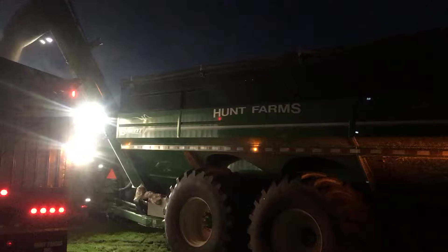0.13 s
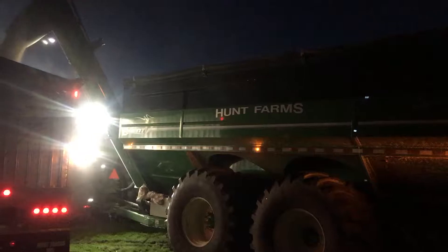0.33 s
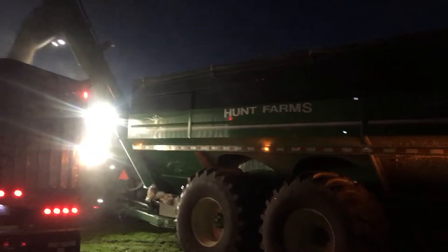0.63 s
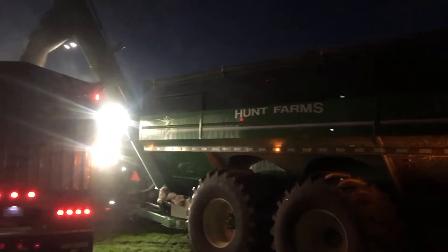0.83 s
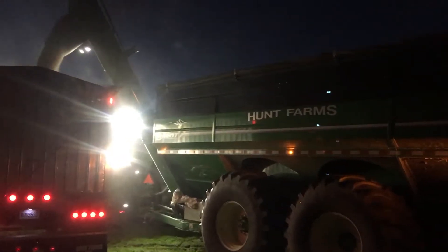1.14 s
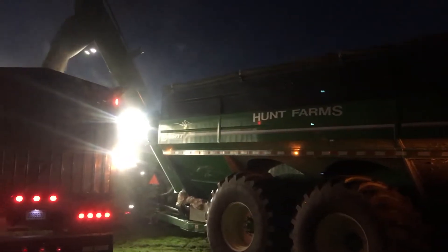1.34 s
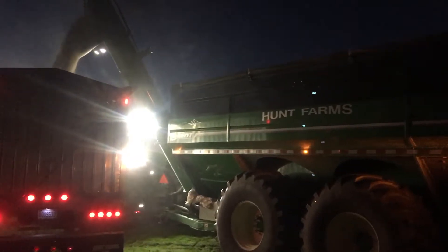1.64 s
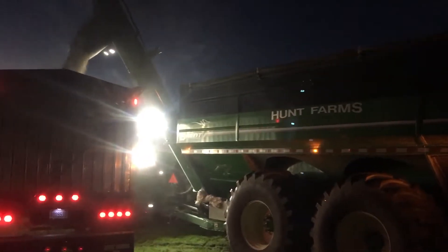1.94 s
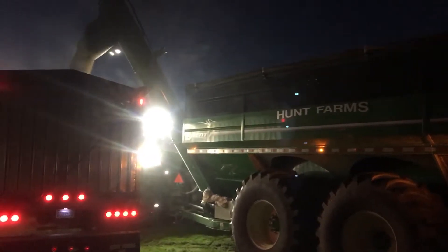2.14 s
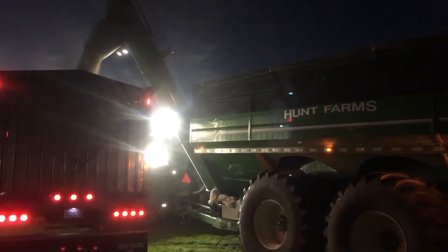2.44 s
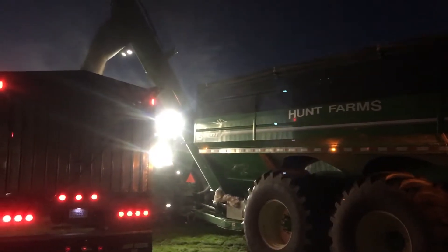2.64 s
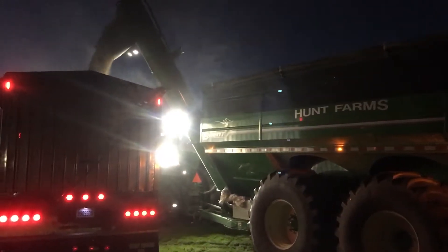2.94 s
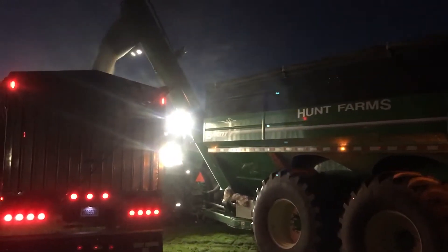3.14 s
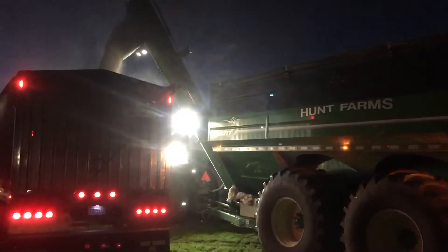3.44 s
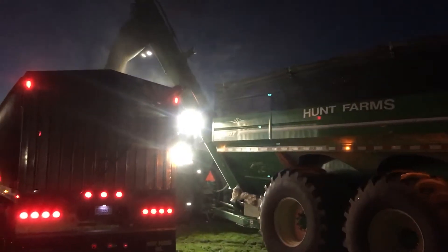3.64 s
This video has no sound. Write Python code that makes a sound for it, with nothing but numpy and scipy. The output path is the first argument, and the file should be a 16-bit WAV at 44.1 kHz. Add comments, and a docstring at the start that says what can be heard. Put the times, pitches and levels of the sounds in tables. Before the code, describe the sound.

Steady harsh roar of grain streaming through a metal auger tube, with tractor drone and low wind

```python
"""Grain is carried up a steel tube by an auger and poured into a trailer, at night on a farm.
Filtered streams of random hits make the tube scrape, the falling grain and the fine rustle;
scrape and fall surge once per auger turn. Wavering sines make the hums of the auger's drive.
A tractor at steady revs drones behind: sines at multiples of its crank speed over filtered noise.
Low noise of uneven level is the breeze on the one microphone. All cuts in after a moment of silence."""
import sys
import numpy as np
from scipy import signal
from scipy.fft import rfft, irfft, next_fast_len
from scipy.io import wavfile
from scipy.ndimage import uniform_filter1d, map_coordinates

SR = 44100
rng = np.random.default_rng(int(sys.argv[2]) if len(sys.argv) > 2 else 0)


def linear_from_db(decibels):
    """Turn decibels (scalar or array-like) into linear amplitude factors; 0 gives 1."""
    return 10 ** (np.asarray(decibels, float) / 20)


def put_to_file(sound):
    """Save the sound as 16-bit audio at rate SR, in the file named by the first command-line argument."""
    columns = np.atleast_2d(sound).T  # one column per channel
    safe = np.clip(columns, -1, 1)
    whole_steps = np.round(safe * 32767)
    wavfile.write(sys.argv[1], SR, whole_steps.astype(np.int16))


N = 166698  # length in samples

# uneven level of the low buffeting noise over time: (t/s, level/dB)
BUFFETING_LEVEL = [(0.13, -32), (0.22, -27), (0.27, -33), (0.35, -26.5), (0.4, -39), (0.48, -22),
                   (0.51, -37), (0.61, -31), (0.64, -29), (0.85, -36.5), (1.03, -31.5), (1.16, -35),
                   (1.25, -23), (1.28, -35), (1.38, -27.5), (1.56, -41), (1.67, -28), (1.7, -36),
                   (2.33, -35), (2.36, -29), (2.4, -45), (3.03, -30.5), (3.76, -33), (3.78, -44)]
# tone colour of the low buffeting noise on the microphone: (f/Hz, relative level/dB)
BUFFETING_COLOUR = [(20, -38), (40, -6), (70, 4.5), (110, 3), (150, -22.5), (300, -58)]
# tones of the engine: (multiple of crank speed, rms level before flicker/dB)
ENGINE_ORDERS = [(2, -56), (3, -51.5), (4, -55), (5, -51.5), (8, -47.5), (9, -64), (10, -44)]
# tone colour of the exhaust and cooling fan roar: (f/Hz, relative level/dB)
ROAR_COLOUR = [(20, -33), (45, -10.5), (140, 0), (280, -1), (335, 1), (420, -5.5), (520, -7), (900, -32),
               (2000, -90)]
# hums of the auger drive: (f/Hz, size of pitch wander/Hz, rms level before flicker/dB)
DRIVE_HUMS = [(674, 4.98, -37), (948, 6.95, -39)]
# resonances of the auger tube: (f/Hz, width/Hz, relative level/dB)
TUBE_PEAKS = [(574, 20, -4.5), (634, 28, 0.5), (670, 39, -4), (768, 82, -3), (879, 42, -7), (952, 83, -2),
              (1123, 130, -5), (1247, 41, -7), (1347, 52, -13.5), (1747, 215, -9)]
# resonances of trailer and grain heap under the stream: (f/Hz, width/Hz, relative level/dB)
HEAP_PEAKS = [(2500, 700, -9.5), (3434, 340, 2), (4100, 440, -11), (4440, 420, -9.5)]
# tone colour of the rustle of kernels and chaff: (f/Hz, relative level/dB)
RUSTLE_COLOUR = [(2900, -19.5), (4900, -6), (5400, -2.5), (7600, -16), (8700, -16), (9900, -21),
                 (10450, -27), (11000, -23), (12200, -24), (15650, -32.5), (16500, -60)]
# strength of the grain flow over time: (t/s, level/dB)
GRAIN_FLOW = [(0.13, 0), (3.78, -0.5)]

START_S = 0.1204  # silent before this time
CRANK_HZ, CRANK_WAVER_HZ = 29.98, 0.116  # crankshaft turns a second; size of their slow drift
AUGER_HZ, AUGER_LEAD_RAD = 8.5, 0.3  # auger turns a second; how far into its turn at time zero
ROAR_DB, TUBE_DB, HEAP_DB, RUSTLE_DB = -32, -23, -15.5, -32
TUBE_SURGE_DB, HEAP_SURGE_DB = 1.02, 0.4  # rise and fall over each auger turn


def unit(x):
    """Scales a sound to rms 1."""
    return x / np.sqrt(np.mean(x ** 2) + 1e-20)


def curve(rows):
    """Joins (time, value) rows by straight lines, one value per sample."""
    seconds, values = np.transpose(rows)
    return np.interp(np.arange(N) / SR, seconds, values)


def wobble(rate_hz):
    """A smooth curve through random points, rate_hz points a second."""
    points = rng.standard_normal(int(N * rate_hz / SR) + 4)
    return map_coordinates(points, [np.arange(N) * rate_hz / SR])


def filtered(x, response):
    """Shapes the spectrum by a gain that depends on frequency, then scales to rms 1."""
    size = next_fast_len(N + 8192)
    spectrum = rfft(x, size) * response(np.fft.rfftfreq(size, 1 / SR))
    return unit(irfft(spectrum, size)[:N])


def colour(points):
    """Makes a gain that joins (f/Hz, level/dB) points on a log frequency axis."""
    freqs, db = np.transpose(points)
    return lambda f: linear_from_db(np.interp(np.log(f + 1), np.log(freqs + 1), db))


def body(peaks, low_hz, high_hz):
    """Makes the gain of a ringing body: resonances add in power, with steep falls below and above."""
    def response(f):
        power = sum(linear_from_db(2 * db) / (1 + (2 * (f - centre) / width) ** 2) for centre, width, db in peaks)
        low_side = 1 + (low_hz / (f + 1)) ** 10
        high_side = 1 + (f / high_hz) ** 10
        return np.sqrt(power / low_side / high_side)
    return response


def kernels(spread_db, patchy_db):
    """A dense stream of uneven hits that bunch in patches of time and pitch."""
    hits = rng.standard_normal(N) * linear_from_db(spread_db * rng.standard_normal(N))
    spectra = signal.stft(hits, nperseg=512)[2]
    patches = rng.standard_normal(spectra.shape)
    patches = uniform_filter1d(patches, 5, 0)  # smooth over pitch
    patches = uniform_filter1d(patches, 8, 1)  # smooth over time
    return signal.istft(spectra * linear_from_db(patchy_db * unit(patches)), nperseg=512)[1][:N]


def breeze():
    """Moving air buffets the microphone: low noise with an uneven, lumpy level."""
    rumble = filtered(rng.standard_normal(N), colour(BUFFETING_COLOUR))
    lumps = rumble * linear_from_db(1.6 * wobble(14))
    return linear_from_db(curve(BUFFETING_LEVEL)) * unit(lumps)


def engine():
    """The crank's slightly unsteady turning sets a row of tones, over a broad roar."""
    angle = 2 * np.pi * np.cumsum(CRANK_HZ + CRANK_WAVER_HZ * wobble(3.18)) / SR
    drone = np.zeros(N)
    for multiple, db in ENGINE_ORDERS:
        level = np.sqrt(2) * linear_from_db(db + 3.3 * wobble(5.81))  # root 2 turns rms into peak
        drone += level * np.sin(multiple * angle + rng.uniform(0, 2 * np.pi))
    roar = filtered(rng.standard_normal(N), colour(ROAR_COLOUR))
    return drone + linear_from_db(ROAR_DB) * roar


def drive():
    """The auger's gearbox hums: tones that wander in pitch and flicker in level."""
    hums = np.zeros(N)
    for hz, wander_hz, db in DRIVE_HUMS:
        level = np.sqrt(2) * linear_from_db(db + 3.8 * wobble(14))
        angle = 2 * np.pi * np.cumsum(hz + wander_hz * wobble(12)) / SR
        hums += level * np.sin(angle)
    return hums


def tube_scrape(surge):
    """Kernels scrape up the steel tube and make it ring, harder once per auger turn."""
    scrape = filtered(kernels(spread_db=2, patchy_db=1.0), body(TUBE_PEAKS, low_hz=534, high_hz=2060))
    return scrape * linear_from_db(TUBE_DB + TUBE_SURGE_DB * surge + 0.65 * wobble(5.9))


def falling_stream(surge):
    """Kernels rain on trailer and heap, which ring higher and surge less than the tube."""
    rain = filtered(kernels(spread_db=2, patchy_db=0.73), body(HEAP_PEAKS, low_hz=1980, high_hz=4870))
    return rain * linear_from_db(HEAP_DB + HEAP_SURGE_DB * surge + 0.82 * wobble(22.03))


def rustle():
    """Kernels and chaff rub together: a fine, bright stream of hits without a surge."""
    return linear_from_db(RUSTLE_DB) * filtered(kernels(spread_db=1.0, patchy_db=0.8), colour(RUSTLE_COLOUR))


def grain():
    """The grain's three sounds share one flow; the auger's turn drives the surge of two."""
    surge = np.cos(2 * np.pi * AUGER_HZ * np.arange(N) / SR + AUGER_LEAD_RAD)
    return linear_from_db(curve(GRAIN_FLOW)) * (tube_scrape(surge) + falling_stream(surge) + rustle())


def scene():
    """One microphone hears every source and feeds both channels."""
    mono = breeze() + engine() + drive() + grain()
    return np.tile(mono, (2, 1))


def band_limit(x):
    """A steep low-pass at the top of the band."""
    return signal.sosfilt(signal.butter(12, 15750, fs=SR, output="sos"), x)


def record(dry):
    """Keeps silence until the sound cuts in."""
    started = np.arange(N) >= START_S * SR
    mix = dry * started
    return band_limit(mix)


dry = scene()
out = record(dry)
put_to_file(out)
```